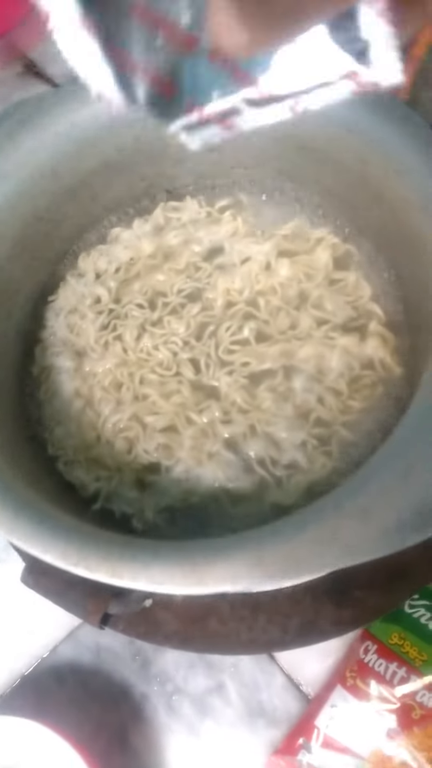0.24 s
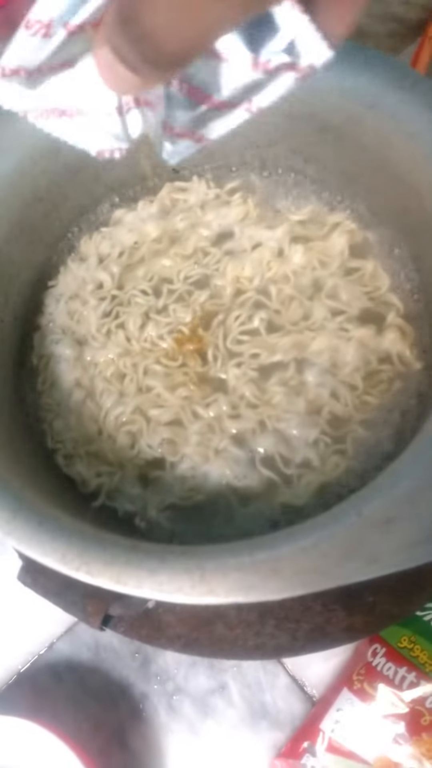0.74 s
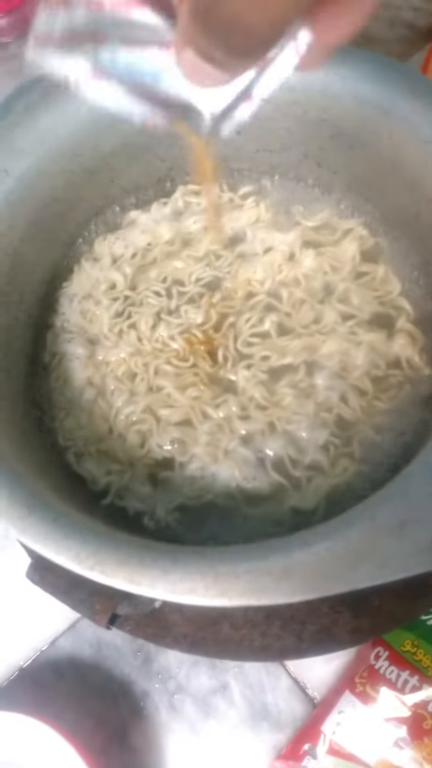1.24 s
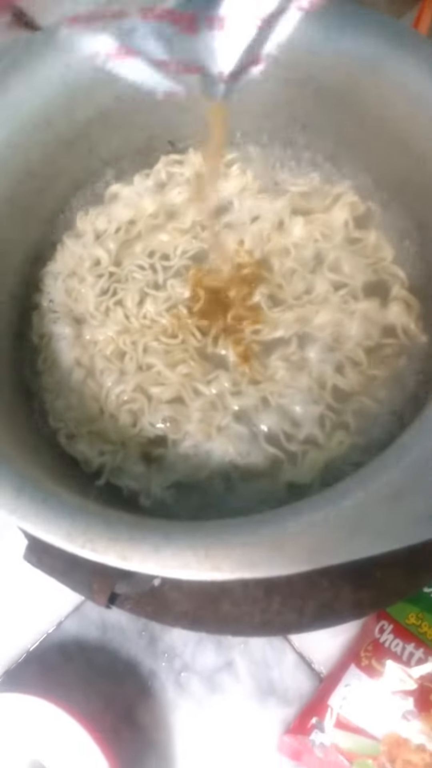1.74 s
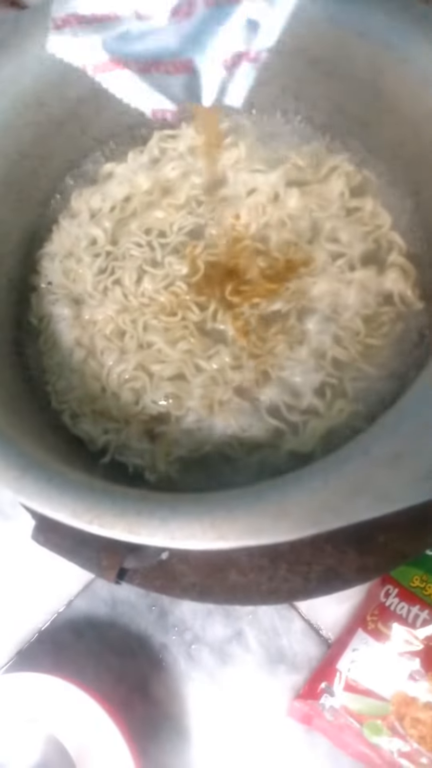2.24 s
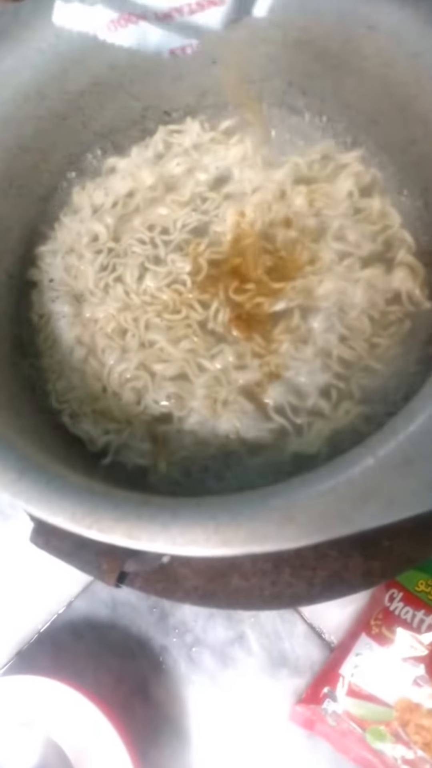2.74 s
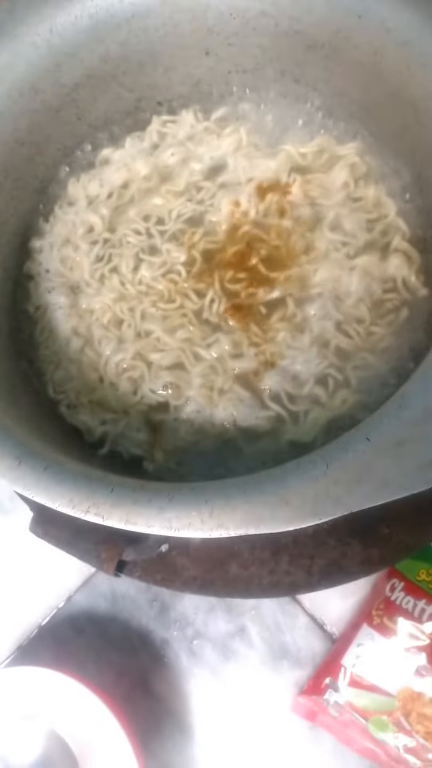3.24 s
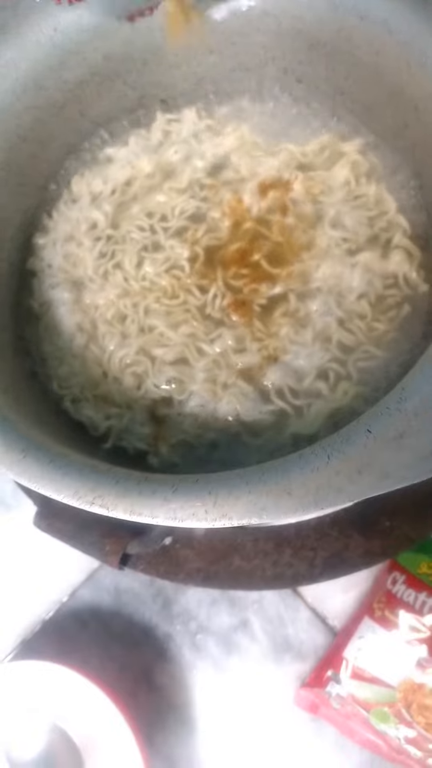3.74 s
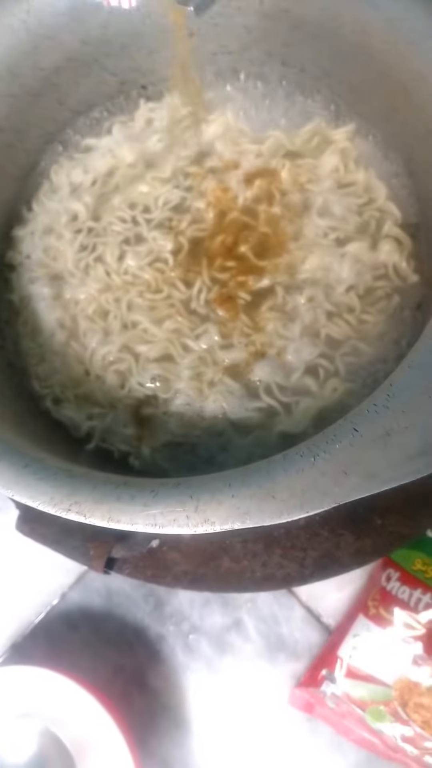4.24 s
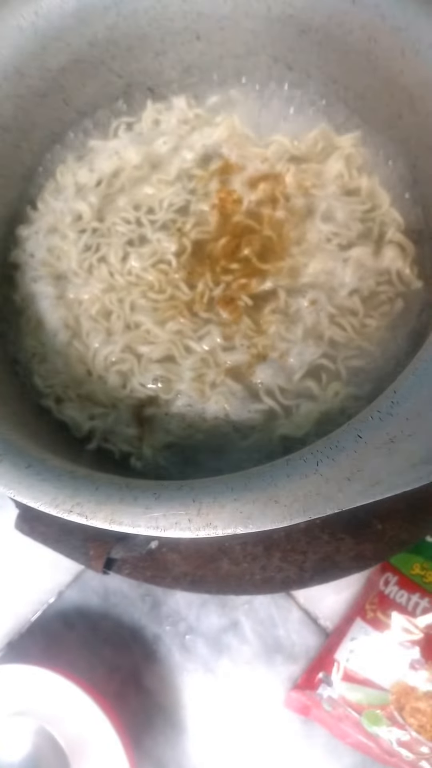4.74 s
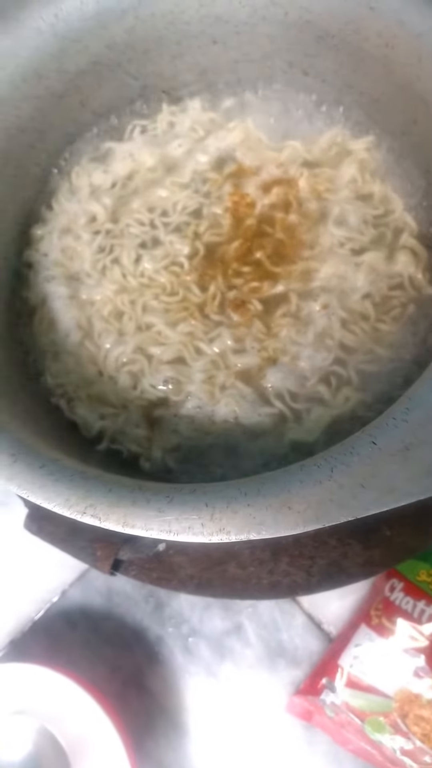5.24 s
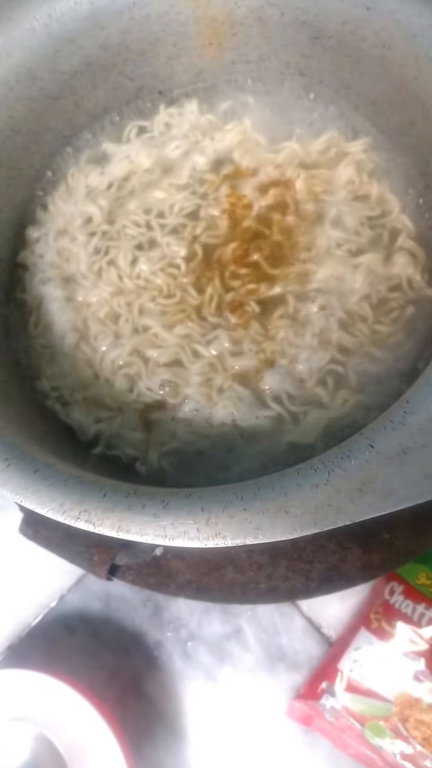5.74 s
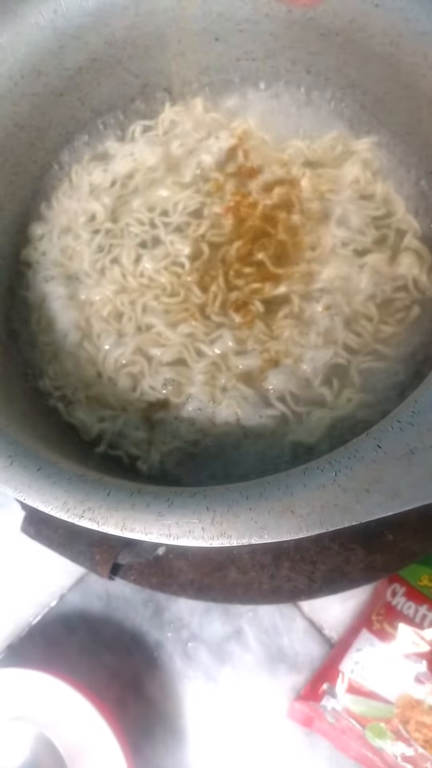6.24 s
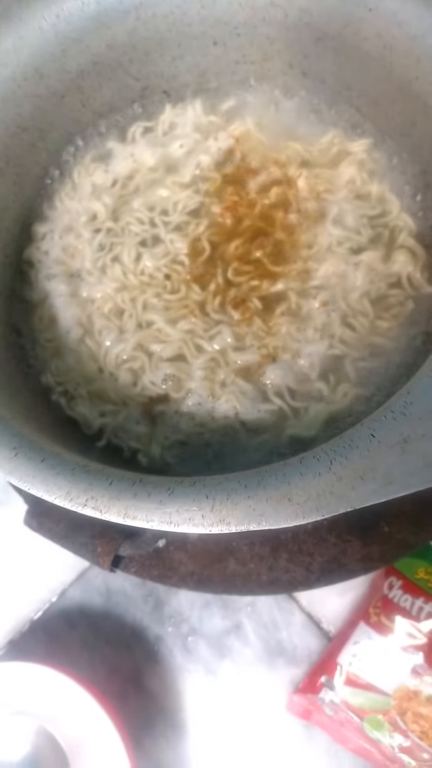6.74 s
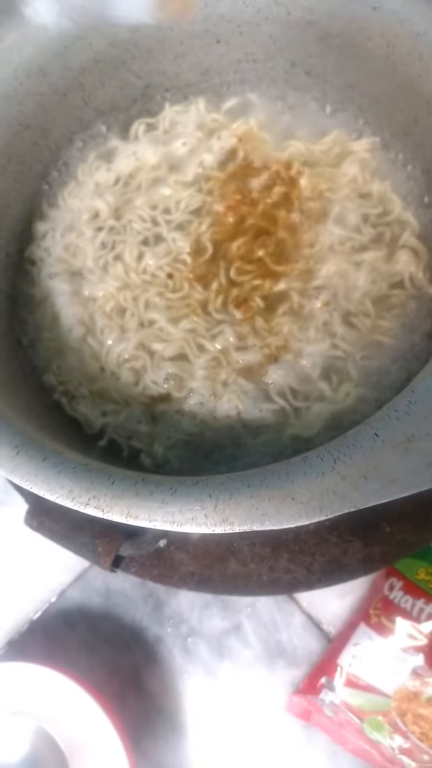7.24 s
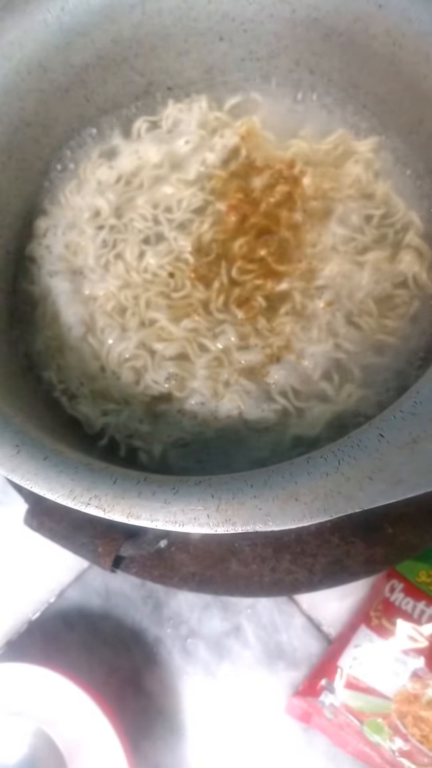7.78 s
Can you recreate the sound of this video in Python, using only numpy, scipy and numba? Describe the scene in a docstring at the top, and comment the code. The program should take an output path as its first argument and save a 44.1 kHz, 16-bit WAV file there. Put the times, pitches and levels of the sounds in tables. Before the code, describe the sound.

Noodles simmer in a metal pot with a low, wavering hum and fine steamy fizz. Brief metallic utensil scrapes come around the first second, then a foil sachet snaps and rustles in irregular bursts, strongest near the end. Faint dull knocks echo in the kitchen and a few low bubbles plop. Close phone pickup; hard foil cracks make the background dip for a moment and creep back.

```python
"""A pot of noodles hums and fizzes under a short utensil scrape; then a foil sachet snaps and rustles in a hand.
Dull knocks, more scrapes and a few plopping bubbles follow. Coloured noise makes the pot, steam and knocks;
short waves make the snaps and bubbles; detuned metal modes make the scrapes. All is heard through a phone's
two ports, the second one duller, of opposite sign and late for close sounds.
The gain control turns everything down after hard peaks and creeps back."""
import sys
import numpy as np
from scipy import signal
from scipy.fft import rfft, irfft, next_fast_len
from scipy.io import wavfile
from scipy.ndimage import uniform_filter1d, map_coordinates
from numba import njit

SR = 44100
rng = np.random.default_rng(int(sys.argv[2]) if len(sys.argv) > 2 else 0)


def master(y):
    """Save y as 16-bit WAV."""
    cut = np.clip(np.atleast_2d(y).T, -1, 1)
    pcm = np.round(cut * 32767)  # scale
    wavfile.write(sys.argv[1], SR, pcm.astype(np.int16))


N = 353241  # samples, about 8 s

# All levels are relative: the mix and the gain control come later.
# Metal pot resonances: pitch_hz [Hz], width_hz [Hz], level_db [dB]
POT_MODES = [(146.5, 5.7, 11), (230, 11.5, 5), (339, 30.4, 5.5), (497.6, 4.6, -4), (569, 3.7, -1),
             (700, 9, -2), (806.4, 12.3, 4.5), (1011, 11, -2.5), (1143, 5, 1)]
# Tone balance of the steam hiss, also used for foil and friction: pitch_hz [Hz], weight_db [dB]
HISS_COLOUR = [(600, -14.5), (2500, -11.5), (5000, -10), (6500, -11), (8000, -7), (10500, 0.5), (13000, -7),
               (15600, -5.5), (16000, -55)]
# Foil creases that snap over: start_s [s], level_db [dB]
FOIL_SNAPS = [(0.0547, -14), (0.217, -9), (0.569, -11.5), (0.5787, -12), (0.585, -9), (0.6303, -15),
              (0.6538, 5), (0.731, 0.5), (1.1921, -3), (1.2208, -1), (1.235, -3), (1.339, -4),
              (1.3718, 13.5), (1.4076, -3), (1.4364, -2.5), (1.5407, -0.5), (1.6921, 2.5), (1.7333, -7),
              (1.7555, 1.5), (1.7767, 2), (1.7963, 4), (1.8072, -3), (1.8156, -8), (1.8682, 10.5),
              (2.0404, 0), (2.0847, -1), (2.0954, 1), (2.1636, -6.5), (2.1964, -8.5), (2.2284, -6.5),
              (2.234, -9), (2.2685, -2.5), (2.2818, 9), (2.29, 4), (2.297, 2), (2.3402, 3.5), (2.4961, -3),
              (2.511, 2), (2.521, 0), (2.5412, 4), (2.5478, -9), (2.5559, -13), (2.615, 0.5), (2.7735, -10),
              (2.8067, 3.5), (2.8455, -10), (2.8596, 4.5), (2.8701, 16), (2.892, 8.5), (2.9078, 4.5),
              (2.9665, -6.5), (2.9895, 0.5), (3.066, -2), (3.213, 3.5), (3.232, 5.0), (3.3264, -2),
              (3.376, -8.0), (3.4475, -4.5), (3.4553, 1), (3.491, 8.5), (3.549, 0.5), (3.5584, 7),
              (3.578, 2), (3.629, -11.0), (3.6582, 2), (3.671, -9.0), (3.7125, 4.5), (3.7559, 8.5),
              (3.7596, 2), (3.7807, 0.5), (3.8955, -6), (3.9163, -1.5), (3.9255, 4), (3.9299, -8),
              (3.9472, -3.0), (3.9666, 5), (3.9769, 0), (3.989, -4), (4.015, 3.5), (4.111, -7),
              (4.147, -4.5), (4.1622, 2.5), (4.1727, 1), (4.2235, -5.0), (4.358, -6), (4.63, 0),
              (4.6613, -7), (4.7431, -1.0), (4.761, 21.0), (4.804, -0.5), (4.8949, 3.5), (4.9054, 2.5),
              (4.9704, 2.5), (4.992, 6.5), (5.0326, -7), (5.2094, 0.5), (5.3663, 3.5), (5.4171, 10),
              (5.461, 3), (5.466, -0.5), (5.513, 7), (5.542, 1.5), (5.6664, 1.5), (5.7184, 3.5), (5.741, 0),
              (5.7464, 5), (5.7832, 0.5), (5.8407, -2), (5.8548, 5), (5.8637, 3.5), (5.8771, 7),
              (5.9145, 0.5), (5.9476, -7), (5.981, -13), (5.9866, 0), (6.0355, 0), (6.0536, 14),
              (6.1225, 4), (6.1402, 2), (6.2516, -0.5), (6.5666, -7.5), (6.672, -4.5), (6.6964, -2),
              (6.718, -9), (6.7482, -8.5), (6.8815, -6.5), (6.905, -3), (6.918, 4), (7.0064, -23),
              (7.0253, -3.5), (7.0376, 2.5), (7.0624, 1.5), (7.078, 8), (7.082, 7), (7.1202, 9),
              (7.1307, 9.5), (7.1385, 6), (7.1577, 8.5), (7.258, 6), (7.2652, 4), (7.2786, 5), (7.336, -2),
              (7.346, -1), (7.4447, -2), (7.4793, -3.5), (7.5455, 0.5), (7.593, 9), (7.5966, 11.5),
              (7.6307, 4), (7.6413, 9), (7.6496, 7), (7.6576, 12), (7.696, 4), (7.752, -9), (7.8785, 7),
              (7.8937, -1), (7.9375, -0.5)]
# Dullness of the far port against the near one: pitch_hz [Hz], weight_db [dB]
FAR_PORT_COLOUR = [(4500, -1.14), (6500, -5), (8100, -11), (10500, -30), (15000, -29.5)]

POT_DB = -44.5  # base level shared by simmer and fizz, before the mix
PORT_LAG, WALL_LAG = 20, -36  # samples by which the far port is late; negative means it hears first


def undb(db):
    """Turns decibels into a plain multiplier."""
    return 10 ** (np.asarray(db) / 20)


def level(x, db):
    """Scales a sound to an average (RMS) level in dB."""
    return x * undb(db) / np.sqrt(np.mean(x ** 2))


def colour(x, points):
    """Weights the spectrum by (Hz, dB) points, joined along a logarithmic pitch scale."""
    hz, db = np.transpose(points)
    size = next_fast_len(N)
    log_hz = np.log(np.arange(size // 2 + 1) * SR / size + 1)  # + 1 avoids log(0)
    weight = undb(np.interp(log_hz, np.log(hz), db))
    return irfft(rfft(x, size) * weight, size)[:N]


def ring(x, hz, width):
    """One resonance, with gain 1 at its centre."""
    return signal.lfilter(*signal.iirpeak(hz, hz / width, SR), x)


def walk(rate):
    """Slow random wander: levels drawn `rate` times a second and joined by slopes; spread near 1."""
    hold = int(SR / rate)
    steps = np.repeat(rng.standard_normal(N // hold + 1), hold)
    return np.sqrt(3 / 2) * uniform_filter1d(steps, hold)[:N]


def grains(s, peak, hz, cycles, size=160, sag=1.):
    """Short waves that swell and die within a few cycles; sag under 1 lets the pitch fall."""
    turns = (np.arange(size) / SR * hz[:, None]) ** sag
    swell = np.e * turns / cycles * np.exp(-turns / cycles)
    shape = swell * np.sin(2 * np.pi * turns)
    first = np.clip(s * SR, 0, N - 1).astype(int)
    out = np.zeros(N + size)
    np.add.at(out, first[:, None] + np.arange(size), peak[:, None] * shape)
    return out[:N]


def simmer():
    """Flame and rolling water: a wavering broad rumble that also rings the pot."""
    # Tone balance of the rumble: pitch_hz [Hz], weight_db [dB]
    rumble_colour = [(25, -52), (65, -13.5), (100, -15), (250, -2), (450, -4), (800, 5.5), (1500, -2),
                     (2500, -3.5), (6000, -45)]
    rumble = colour(rng.standard_normal(N), rumble_colour) * undb(2.2 * walk(20))
    pot = sum(undb(db + 2.8 * walk(6)) * ring(rumble, hz, width) for hz, width, db in POT_MODES)
    return level(rumble + pot, POT_DB)


def foil_ring(x, tail_db, tail_s):
    """Adds a brief fading noise tail to each click; for foil, the sheet shivers for a moment."""
    t = np.arange(SR // 50) / SR
    tail = rng.standard_normal(len(t)) * np.exp(-t / tail_s) * undb(tail_db)
    return x + signal.fftconvolve(x, tail)[:N]


def creases(count, db):
    """Scattered small ticks of many pitches, a few of them much stronger than the rest."""
    chance = rng.random((count, 3)).T
    peak = undb(np.minimum(-5 * np.log(chance[1]), 13))
    ticks = grains(chance[0] * N / SR, peak, 5500 + 8000 * chance[2], cycles=1.0, size=60)
    return level(colour(foil_ring(ticks, tail_db=-26.0, tail_s=0.0043), HISS_COLOUR), db)


def fizz():
    """Wavering steam hiss with froth bursting in it as small ticks."""
    waver = undb(1.5 * walk(12))
    hiss = level(colour(rng.standard_normal(N), HISS_COLOUR), 7.5) * waver
    froth = creases(count=900, db=1.0)
    return (hiss + froth) * undb(POT_DB)


def scrapes():
    """Uneven friction rasps over thin metal; modes near the sliding contact's moving centre ring most.
    The grip detunes every mode a little for each stroke and bends it along with the centre."""
    # Strokes: start_s [s], length_s [s], level_db [dB], centre_start_hz [Hz], centre_end_hz [Hz]
    strokes = [(0, 0.06, -42, 4250, 3400), (0.783, 0.16, -30.5, 2806, 4500), (0.972, 0.16, -33, 3900, 3000),
               (4.374, 0.19, -33.5, 2990, 4000), (7.325, 0.174, -30, 3210, 3400)]
    # Utensil resonances: pitch_hz [Hz], width_hz [Hz], level_db [dB]
    utensil_modes = [(2545, 39, -8.5), (3140, 91, -12.5), (3480, 170, -9.5), (4130, 45, -5),
                     (5220, 110, -6.5)]
    out, t = np.zeros(N), np.arange(SR // 2) / SR
    rasp = level(ring(rng.standard_normal(N), 3100, 1400), -11.0)
    rasp = rasp + level(colour(rng.standard_normal(N), HISS_COLOUR), -8.5)
    modes = []
    for hz, width, db in utensil_modes:
        tone = level(ring(rng.standard_normal(N), hz, width), db)
        modes.append((hz, tone * undb(3 * walk(45))))
    for s, length, db, start_hz, end_hz in strokes:
        along = np.clip(t / length, 0, 1)
        now = (s * SR + np.arange(len(t))).astype(int)
        centre = start_hz + (end_hz - start_hz) * along
        # reading a mode faster or slower raises or lowers its pitch
        bend = (2 * centre / (start_hz + end_hz)) ** 0.22
        detune = 1 + 0.02 * rng.standard_normal((len(modes), 1))
        places = now[0] + np.cumsum(bend * detune, axis=1)
        tone = 0
        for (hz, mode), place in zip(modes, places):
            bent = map_coordinates(mode, [place], order=3, prefilter=False, mode="mirror")
            tone = tone + bent * (0.36 + np.exp(-((hz - centre) / 1000) ** 2))
        stroke = np.sin(np.pi * along ** 0.67) ** 1.45
        echo = 0.5 * (1 - np.exp(-t / 0.064)) * np.exp(-t / 0.16)
        out[now] += undb(db) * (stroke + echo) * (tone + rasp[now])
    return out


def shaking(t):
    """Strength of the grip at times t: a quick rise into each spell, a hold and a quick release."""
    # Spells of working the sachet: start_s [s, full strength], length_s [s], level_db [dB]
    spells = [(1.364, 0.032, -25.5), (1.706, 0.2, -27), (2.065, 0.026, -28), (2.874, 0.024, -19),
              (3.193, 0.094, -25.5), (3.479, 0.087, -21.5), (3.698, 0.18, -27), (3.91, 0.1, -29),
              (4.613, 0.25, -39), (5.108, 0.23, -30.5), (5.391, 0.18, -31), (5.66, 0.091, -26),
              (6.651, 0.12, -29.5), (6.847, 0.053, -29), (7.01, 0.14, -17.5), (7.249, 0.098, -20.5),
              (7.454, 0.102, -24.5), (7.591, 0.13, -27.5), (7.896, 0.046, -22.5)]
    attack_s, release_s = 0.0039, 0.0063
    grip = 0
    for s, length, db in spells:
        rise = np.minimum(t - s, 0) / attack_s
        fall = np.maximum(t - s - length, 0) / release_s
        grip = grip + undb(db) * np.exp(rise - fall)
    return grip


def handling(before_s, after_s):
    """How strained the foil is: it builds before each snap, settles after it and levels off in dense runs."""
    s, db = np.transpose(FOIL_SNAPS)
    marks = np.zeros(N)
    marks[(s * SR).astype(int)] = undb(np.minimum(db, 3))
    t = np.arange(-SR // 5, SR // 5 + 1) / SR
    strain = np.exp(np.where(t < 0, t / before_s, -t / after_s))
    return np.tanh(0.5 * signal.fftconvolve(marks, strain, "same"))


def rustle():
    """A swarm of small creases around the snaps, and a papery hush after them and through each shake,
    when the powder inside also slides with a duller hiss."""
    hush = level(colour(rng.standard_normal(N), HISS_COLOUR), 0)
    grip = np.repeat(shaking(np.arange(0, N, 64) / SR), 64)[:N]  # updated every 64 samples
    swarm = creases(count=1400, db=-27.5) * handling(before_s=0.013, after_s=0.033)
    pouring = level(ring(rng.standard_normal(N), 1800, 2500), -21) * grip
    hush_strength = undb(-23.0) * handling(before_s=0.00047, after_s=0.015) + undb(-13) * grip
    return swarm + pouring + hush * hush_strength


def lesser_snaps(count, over_db, spread_db):
    """Times (s) and levels (dB) of chance snaps, which follow the strength of the grip."""
    resting_grip_db = -51.5  # the sachet still ticks between shakes
    chance = rng.random((count, 2)).T
    s = chance[0] * N / SR
    grip_db = 20 * np.log10(shaking(s) + undb(resting_grip_db))
    return s, grip_db + over_db + np.minimum(-spread_db * np.log(chance[1]), 7)


def snaps(s, db):
    """Each crease clicks brightly, with a duller body and a quick after-click."""
    chance = rng.random((len(s), 5)).T
    hz = 9900 + 1600 * chance[4]
    click = grains(s, undb(db), hz, cycles=1.0)
    body = grains(s, undb(db - 15.5 - 41 * chance[0]), 2600 + 3400 * chance[1], cycles=1.0)
    after_s = s + 0.00027 + .0004 * chance[2]
    after = grains(after_s, undb(db - 10.5), hz * (0.6 + 0.18 * chance[3]), cycles=0.75)
    return foil_ring(click + body + after, tail_db=-25.0, tail_s=0.0026)


def knocks():
    """Distant dull blows, made as fading noise like their kitchen echo; the pot rings along."""
    # Blows: start_s [s], level_db [dB], centre_hz [Hz], t60_s [s to fade by 60 dB]
    blows = [(0.097, -35, 770, 0.53), (.515, -41, 1290, 0.5), (.565, -48.5, 636, 0.92),
             (2.373, -39.5, 695, 0.49), (3.055, -43, 840, 1), (3.213, -31.5, 930, 0.27),
             (3.397, -43.5, 890, 0.56), (5.623, -28.5, 1270, 0.27)]
    out, t = np.zeros(N), np.arange(SR) / SR
    for s, db, hz, t60 in blows:
        noise = ring(rng.standard_normal(SR), hz, 1.58 * hz)
        echo = level(ring(noise, hz, 1.58 * hz), 0)
        fade = undb(db - 60 * t / t60) * (1 - np.exp(-t / 0.0028))
        out[int(s * SR):][:SR] += fade * echo
    return out + sum(undb(db + 0.5) * ring(out, hz, 3 * width) for hz, width, db in POT_MODES)


def plops():
    """Big bubbles collapse, each as a short low wave whose pitch sags."""
    # Fat bubbles: start_s [s], level_db [dB], pitch_hz [Hz, the falling pitch passes through it]
    bubbles = [(1.197, -24, 253), (1.228, -26, 262), (1.781, -27.5, 220), (3.911, -14.5, 320),
               (4.574, -16, 246), (5.238, -23, 241.7), (5.738, -26, 171)]
    s, db, hz = np.transpose(bubbles)
    return grains(s, undb(db), hz, cycles=0.48, size=1800, sag=0.64)


def ports(x, lag):
    """Near and far port; the far one is dull, of opposite sign and late by lag samples."""
    return np.array([x, -np.roll(colour(x, FAR_PORT_COLOUR), lag)])


def scene():
    """Mixes the close sounds, low wall sound and scattered echo at the two ports."""
    lesser = lesser_snaps(count=1500, over_db=11.0, spread_db=4.0)
    creased = np.hstack([np.transpose(FOIL_SNAPS), lesser])
    pot = undb(0.5) * simmer() + fizz() + plops()
    near = pot + scrapes() + rustle() + snaps(*creased) + knocks()
    # low sound from the wall behind meets the far port first; its noise is drawn afresh
    back = colour(simmer() + knocks(), [(700, 0.5), (1400, -31.0)])
    # scattered kitchen echo and warm air on the ports are unrelated left and right
    echo = []
    for port in range(2):
        low = colour(simmer(), [(70, 14.0), (250, 2.5), (3000, -55)])
        echo.append(low + undb(-58.0) * fizz())
    # the far port also hears the other face of the foil, which rings in its own way
    other_face = undb(-8.5) * np.roll(snaps(*creased), PORT_LAG)
    far_extra = colour(echo[1] + other_face, FAR_PORT_COLOUR)
    return ports(near, PORT_LAG) + ports(back, WALL_LAG) + np.array([echo[0], far_extra])


@njit
def follow(room_db, keep):
    """Gain in dB: falls at once to the room left under the ceiling, then relaxes towards 0."""
    out, g = np.empty(len(room_db)), 0.
    for i in range(len(room_db)):
        g = min(g * keep, room_db[i])
        out[i] = g
    return out


def record(dry):
    """The gain control ducks just after hard peaks, whose first swings are rounded off;
    then the lowest and highest pitches are cut."""
    ceiling_db, recovery_s = -8.5, 1.154
    reaction = 7  # samples before the gain responds
    low_cut_hz, high_cut_hz = 26, 16700
    room_db = ceiling_db - 20 * np.log10(np.abs(dry).max(axis=0) + 1e-9)
    gain_db = follow(room_db, np.exp(-1 / (recovery_s * SR)))
    held = dry * undb(np.concatenate([np.zeros(reaction), gain_db])[:N])
    rounded = held / (1 + np.abs(held / .8) ** 4) ** .25
    low_cut = signal.butter(2, low_cut_hz, "high", fs=SR, output="sos")
    high_cut = signal.ellip(10, .2, 80, high_cut_hz, fs=SR, output="sos")
    return signal.sosfilt(high_cut, signal.sosfilt(low_cut, rounded))


dry = scene()
out = record(dry)
master(out)
```